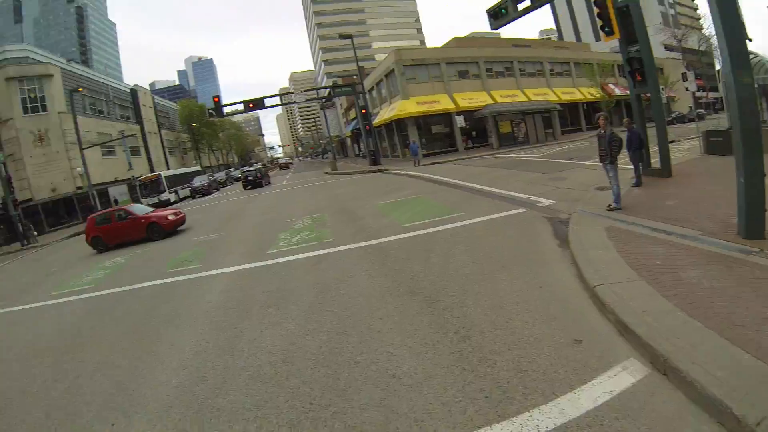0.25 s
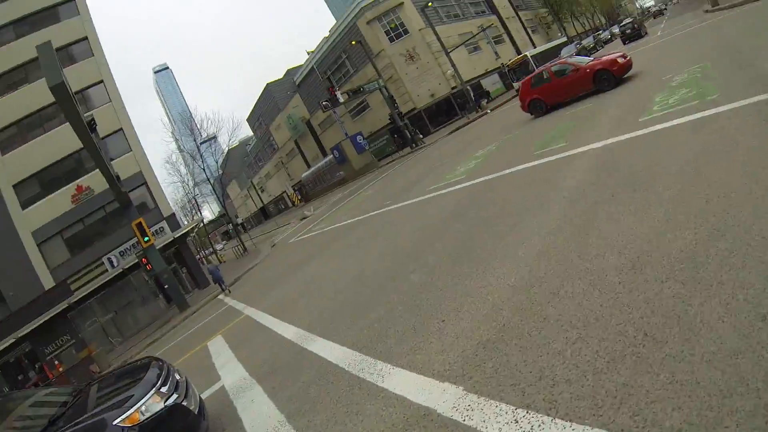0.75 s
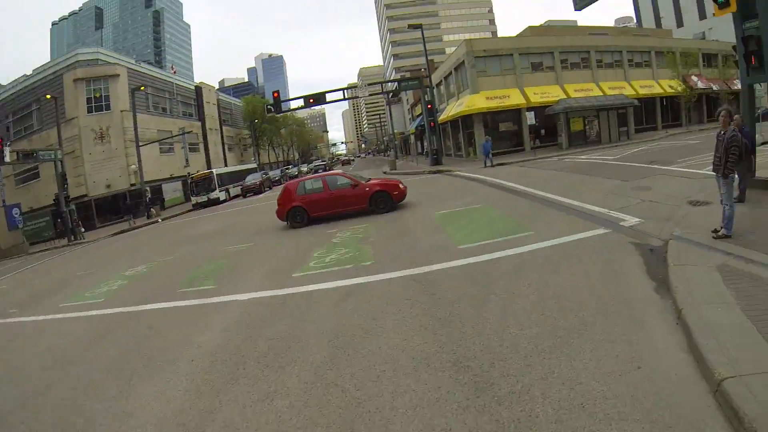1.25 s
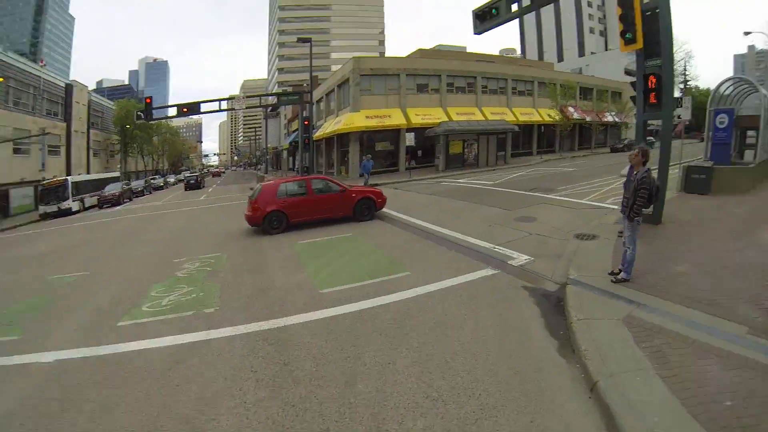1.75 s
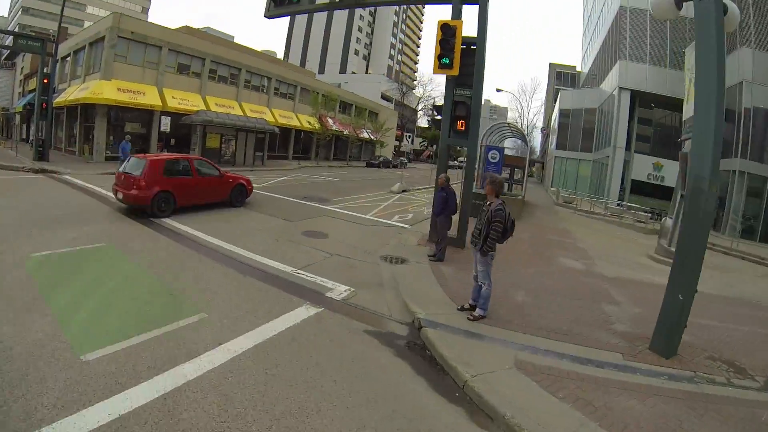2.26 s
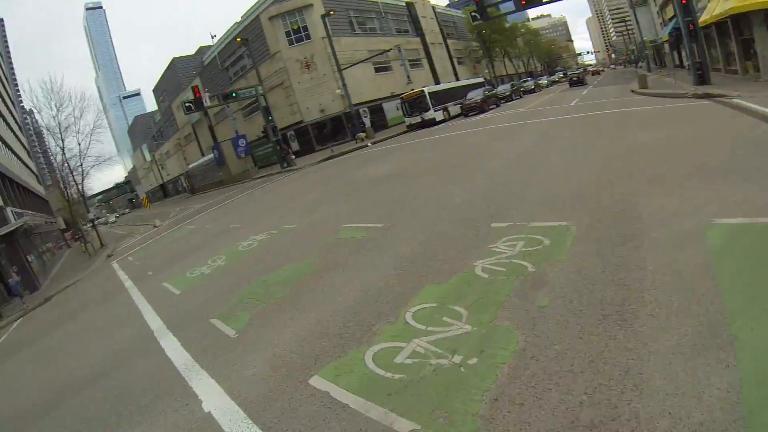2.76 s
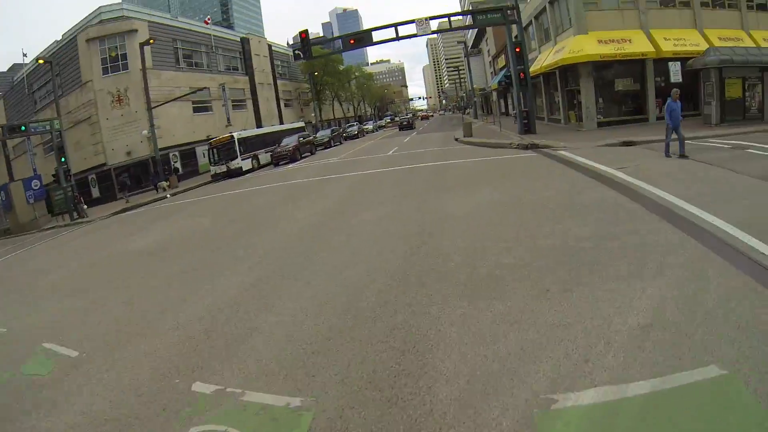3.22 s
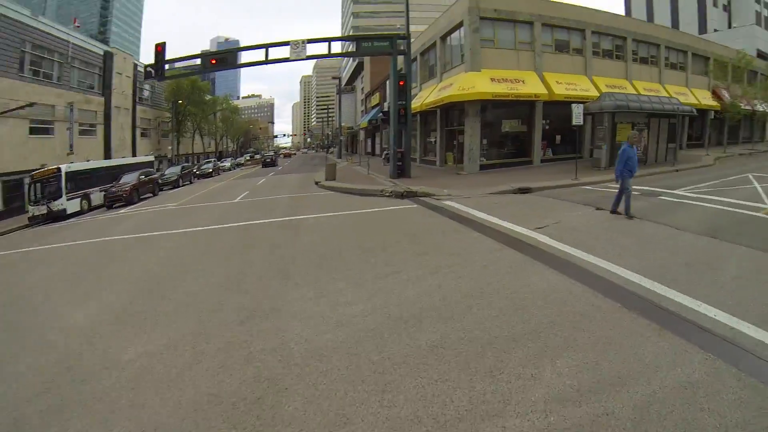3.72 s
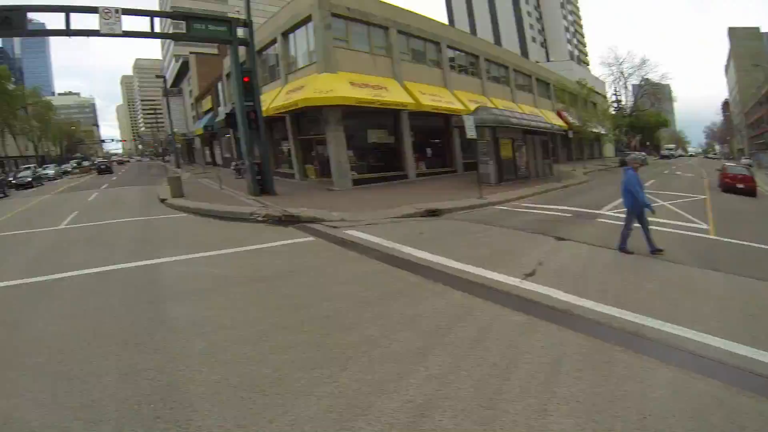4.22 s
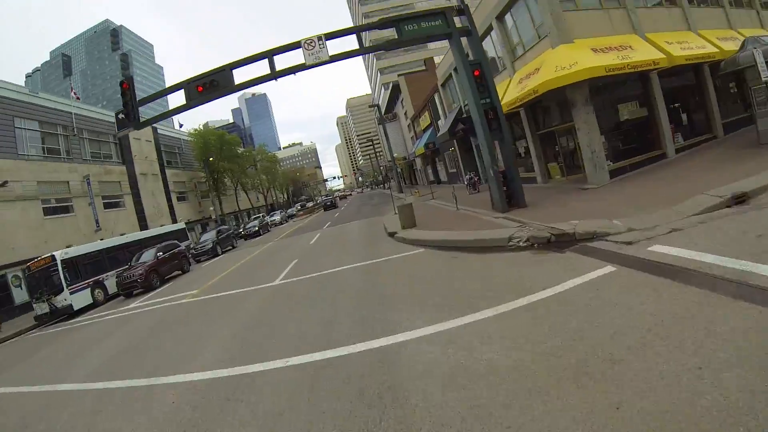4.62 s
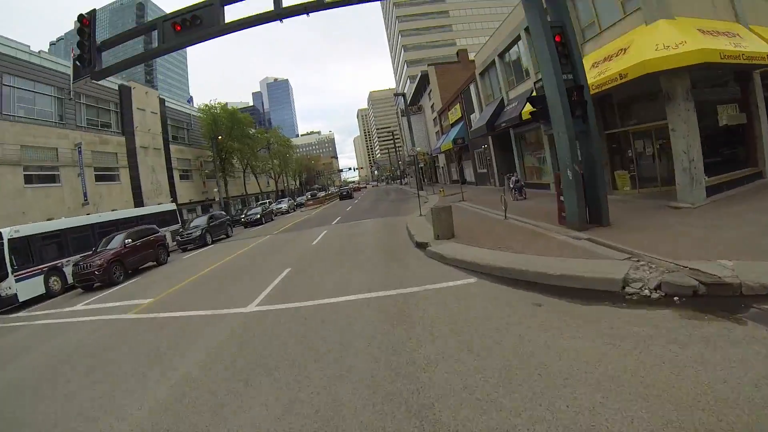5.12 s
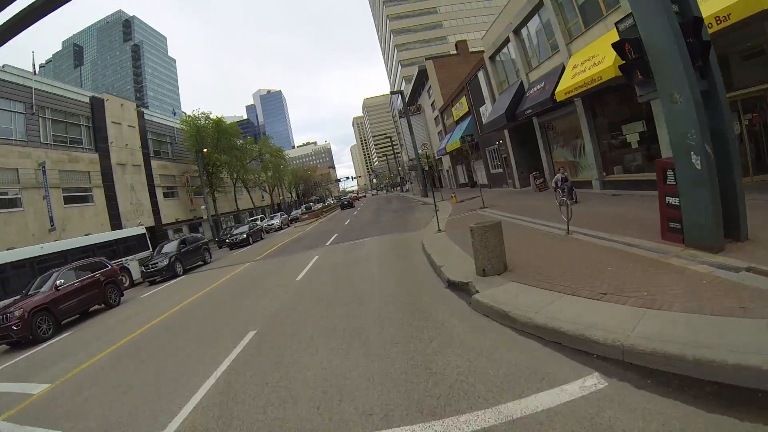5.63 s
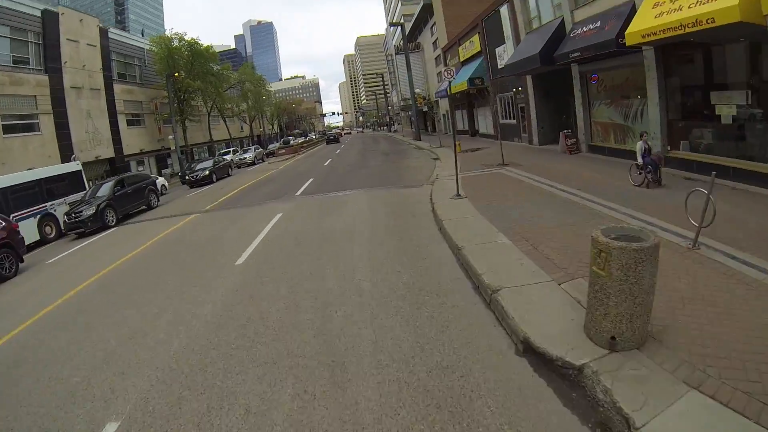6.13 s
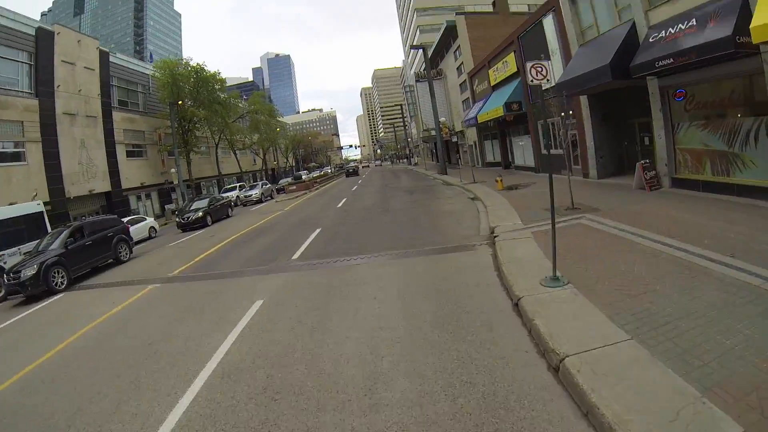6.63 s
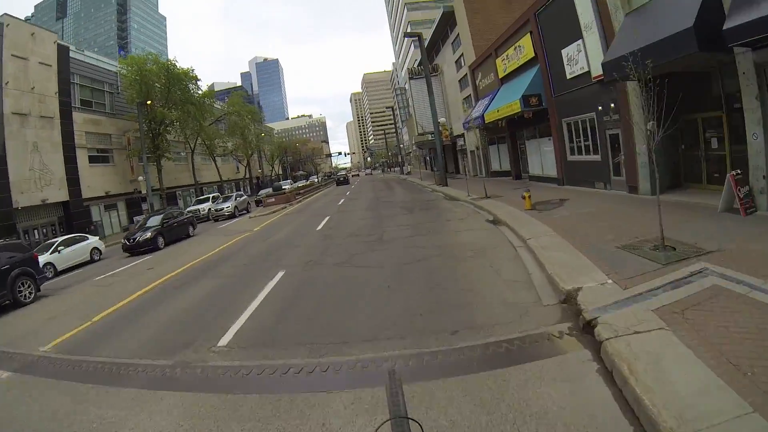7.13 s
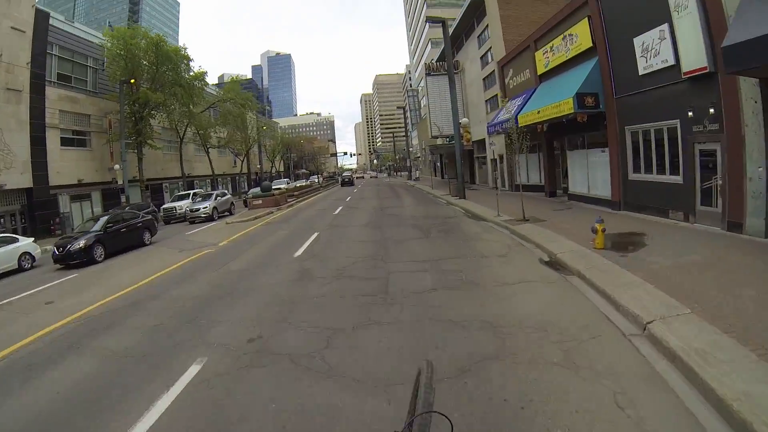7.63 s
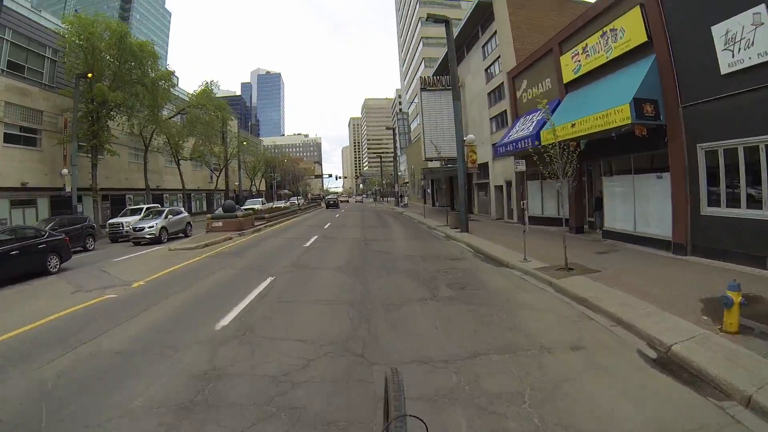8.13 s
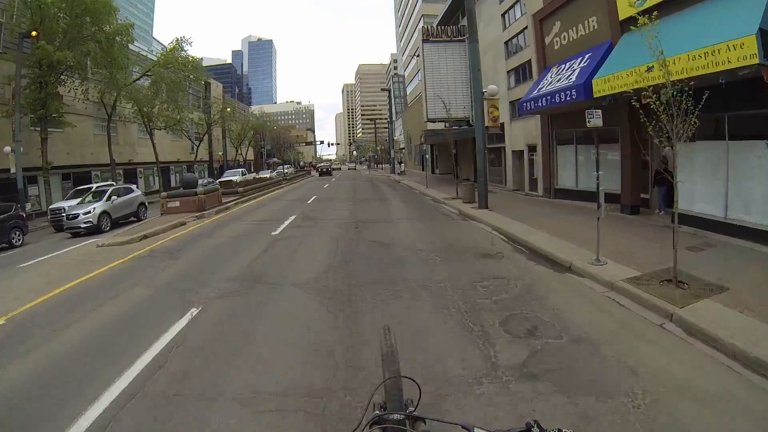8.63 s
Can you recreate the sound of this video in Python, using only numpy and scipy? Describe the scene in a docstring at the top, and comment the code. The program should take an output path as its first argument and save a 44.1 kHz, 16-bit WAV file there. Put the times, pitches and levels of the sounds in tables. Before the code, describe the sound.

Close, boxy sound from a small encased microphone on a cyclist outdoors in town. First a gritty scrape and rattle, broken off sharply, then a short gap. Tyres swell in with a steady hollow rush, wind flutters deep below, metal parts tick and jingle briefly, the case knocks. Bumps thud, the strongest late on, followed by chain chatter, low tyre moan and distant traffic.

```python
"""A city street, where a bicycle rolls along, heard by a small microphone shut in a plastic case on the rider.
A loud scraping clatter of filtered noise breaks off; after a short silence the ride fades in.
Wind and frame are slow and resonant noise; tyres, traffic and case cavity are noise shaped in bands.
Chain, loose part and case are struck modes that ring and decay; bumps are smooth pressure pulses.
Faint gliding whistles, a top hiss and a regularly repeated buzz lie behind them."""
import sys
import numpy as np
from scipy import signal
from scipy.fft import rfft, irfft, next_fast_len
from scipy.io import wavfile
from scipy.ndimage import uniform_filter1d

SR = 44100
rng = np.random.default_rng(int(sys.argv[2]) if len(sys.argv) > 2 else 0)


def transcribe(u):
    """Save the signal u as a 16-bit wav file named by the first command-line argument.

    u: samples, shape (n,) or (channels, n), limited to [-1, 1]; the rate is SR.
    q: integer samples, one column per channel.
    """
    v = np.clip(np.atleast_2d(u).T, -1, 1)
    q = np.round(v * 32767).astype(np.int16)
    wavfile.write(sys.argv[1], SR, q)


N = 391166
BREAK_S, RETURN_S = .2858, 0.323  # end of the clatter, start of the ride
FRAME_HZ = 87.8


def from_db(db):
    """Level to amplitude: 20 dB is a factor of ten."""
    return 10 ** (np.asarray(db) / 20)


def rms_one(x):
    """Normalise by the root mean square, so that a later gain sets the level."""
    return x / np.sqrt(np.mean(x ** 2) + 1e-20)


def seconds():
    """Uniform sampling: the time of every sample."""
    return np.arange(N) / SR


def in_time(rows):
    """Linear interpolation of the columns of a table, one value per sample."""
    s, *columns = np.transpose(rows)
    return [np.interp(seconds(), s, column) for column in columns]


def drift(rate):
    """Low-passed noise of rms 1: two equal poles at the rate in Hz leave only slow fluctuation."""
    step = 40  # samples between the computed values
    r = np.exp(-2 * np.pi * rate * step / SR)
    settling = 2000
    noise = rng.standard_normal(N // step + settling + 2)
    slow = signal.lfilter([1], [1, -2 * r, r * r], noise)[settling:]
    return np.interp(np.arange(N) / step, np.arange(len(slow)), rms_one(slow))


def coloured(x, spectrum):
    """Spectral shaping of x to rms 1, with a steep extra fall beyond both ends of the table."""
    size = next_fast_len(N)
    hz = np.arange(1, size // 2 + 2) * SR / size
    at, db = np.transpose(spectrum)
    octaves_outside = np.maximum(np.log2(at[0] / hz), 0) + np.maximum(np.log2(hz / at[-1]), 0)
    gain = from_db(np.interp(np.log(hz), np.log(at), db) - 16.8 * octaves_outside)
    return rms_one(irfft(rfft(x, size) * gain, size)[:N])


def turbulence(spectrum, patchy_db, rate, grit_db=0):
    """Intermittency: uneven grains in six bands whose levels fluctuate partly together, partly alone."""
    edges = np.geomspace(spectrum[0][0] * .8, min(spectrum[-1][0] * 1.2, 20000), 7)
    together, out = drift(rate), 0
    for low, high in zip(edges, edges[1:]):
        grain_db = grit_db * np.minimum(rng.exponential(1, N), 4)
        grains = rng.standard_normal(N) * from_db(grain_db)
        band = signal.sosfilt(signal.butter(2, [low, high], "band", fs=SR, output="sos"), grains)
        out = out + band * from_db(patchy_db * (together + 0.39 * drift(rate)))
    return coloured(out, spectrum)


def resonate(x, hz, width_hz):
    """A damped resonator as a band-pass with gain 1 at its peak."""
    r = np.exp(-np.pi * width_hz / SR)
    top = (1 - r * r) / 2
    return signal.lfilter([top, 0, -top], [1, -2 * r * np.cos(2 * np.pi * hz / SR), r * r], x)


def ring_mode(force, hz, t60):
    """Modal impulse response: a sine that decays by 60 dB in t60 seconds."""
    q, w = from_db(-60 / (t60 * SR)), 2 * np.pi * hz / SR
    return signal.lfilter([0, np.sin(w)], [1, -2 * q * np.cos(w), q * q], force)


def strike(times, level_db, modes, spread_db, contact_s=.0026):
    """Modal excitation: a short gritty contact drives every mode, with a random strength for each."""
    at, out = np.minimum((np.asarray(times) * SR).astype(int), N - 1), np.zeros(N)
    chance = rng.standard_normal((len(at), len(modes)))
    r = np.exp(-1 / (contact_s * SR))
    for k, (hz, db, t60) in enumerate(modes):
        clicks = np.full(N, 1e-18)
        clicks[at] = from_db(level_db + db + spread_db * chance[:, k])
        contact = signal.lfilter([np.sqrt(1 - r * r)], [1, -r], clicks)
        grit = contact * rng.choice([-1, 1], N)
        out += ring_mode(grit, hz, t60)
    return out


def evened(x, window_s):
    """Partial level compression: divide out much of the running rms, then set rms 1."""
    level = np.sqrt(uniform_filter1d(x ** 2, int(window_s * SR)) + 1e-9)
    return rms_one(x / level ** 0.76)


def clatter():
    """Friction noise: a gritty scrape in three bands with separate envelopes, plus narrow resonances."""
    # swells of the scrape: t/s, body level/dB, bright scrape level/dB, air level/dB
    scrape_levels = [(0.0, -28, -33, -42), (0.008, -29.5, -38.5, -45), (0.028, -34.5, -46, -53),
                     (0.033, -40.5, -49, -57), (0.102, -43.5, -64.5, -73), (0.148, -42, -53, -69),
                     (0.158, -37.5, -58, -63), (0.212, -36, -46, -51.5), (0.228, -33.5, -47, -49),
                     (0.24, -41.5, -50.5, -56), (0.268, -41, -51.5, -54), (0.285, -47, -59, -61)]
    # spectrum of the body: f/Hz, relative density/dB
    body_spectrum = [(88, -35), (150, -11.5), (288, -15.5), (377, -17), (613, -26), (697, -15.5),
                     (856, -19.5), (960, -15), (1430, -6), (1690, -3.5), (2150, -15), (3200, -22.5),
                     (4160, -60), (7040, -120)]
    # spectrum of the bright scrape: f/Hz, relative density/dB
    bright_spectrum = [(1650, -25), (2800, -0.5), (3690, -1.5), (4480, -4), (4960, 1), (5340, -2),
                       (5590, -9), (5780, -17), (6200, -2.5), (8060, -46), (13600, -120)]
    # spectrum of the air: f/Hz, relative density/dB
    air_spectrum = [(3410, -41), (5800, -20), (6350, -6), (7150, -7), (8790, -6.5), (9860, -6.5),
                    (14200, -16), (15500, -27)]
    # narrow resonances: f/Hz, width/Hz, level/dB against the layer, layer (0 body, 1 scrape)
    narrow_rings = [(970, 150, -7.5, 0), (1730, 41, 0, 0), (2440, 70, -16, 0), (3680, 150, -5, 1),
                    (5330, 140, 1, 1)]
    t, levels, out = seconds(), in_time(scrape_levels), 0
    for db, spectrum in zip(levels, (body_spectrum, bright_spectrum, air_spectrum)):
        out = out + from_db(db) * turbulence(spectrum, patchy_db=1.5, rate=47.0, grit_db=3.5)
    second_surge = np.clip((t - .15) / 0.028, 0, 1)
    for hz, width_hz, db, layer in narrow_rings:
        ring = evened(resonate(rng.standard_normal(N), hz, width_hz), 0.015)
        out += from_db(levels[round(layer)] + db) * ring * second_surge
    return out * (t <= BREAK_S)


def wind_and_frame():
    """Turbulent pressure on the case, and forced resonance of the frame under road shocks."""
    # low end under the opening clatter: t/s, wind level/dB, frame hum level/dB
    opening_low = [(0.0, -19, -20), (0.054, -48, -44), (0.096, -30.5, -44), (0.196, -30, -50.5),
                   (0.23, -26, -36.5), (0.28, -33, -45.5)]
    # wind pressure on the case during the ride: t/s, level/dB
    gust_levels = [(0.36, -45), (0.57, -39.5), (0.66, -26.5), (0.8, -31), (0.95, -38), (1.12, -36),
                   (1.3, -50), (1.38, -36), (1.68, -44.5), (1.99, -30), (2.04, -48), (2.18, -32),
                   (2.31, -31), (2.4, -41.5), (2.86, -36.5), (2.9, -29), (3.34, -40), (3.39, -30),
                   (3.58, -43.5), (3.62, -24.5), (3.72, -47), (3.81, -35), (4.02, -41.5), (4.27, -30.5),
                   (5.1, -42), (5.19, -36.5), (5.3, -46), (5.8, -40.5), (6.24, -40.5), (6.4, -48),
                   (6.53, -24), (6.67, -23.5), (7.08, -38), (7.14, -31.5), (7.2, -46), (7.37, -32),
                   (7.56, -39), (7.88, -27.5), (8.17, -47), (8.24, -33), (8.3, -47), (8.42, -35.5),
                   (8.87, -42)]
    # road shocks in the frame during the ride: t/s, level/dB
    shock_levels = [(0.4, -56), (0.9, -58.5), (1.3, -59.5), (2.25, -58), (2.29, -44), (2.4, -64.5),
                    (2.9, -56.5), (2.92, -44), (3.07, -48), (4.02, -61.5), (4.08, -43), (4.36, -60),
                    (4.48, -51.5), (5.16, -54.5), (5.88, -49), (5.92, -46), (6.25, -50.5), (6.59, -44),
                    (6.67, -30.5), (6.72, -41.5), (6.76, -35.5), (6.84, -40), (6.91, -57), (7.69, -46.5),
                    (7.75, -58), (7.98, -45), (8.03, -48), (8.07, -50), (8.83, -54), (8.87, -59)]
    # spectrum of the wind: f/Hz, relative density/dB
    wind_spectrum = [(6, 1.5), (15, 1), (25, -16), (40, -17.5), (55, -21.5), (68, -25)]
    wind_lumps_db, wind_lumps_hz = 1, 4
    hum_lumps_db, hum_lumps_hz = 2.5, 12.5
    frame_width_hz = 17
    opening = seconds() < BREAK_S
    first_wind_db, first_hum_db = in_time(opening_low)
    ride_wind_db = in_time(gust_levels)[0] + wind_lumps_db * drift(wind_lumps_hz)
    ride_hum_db = in_time(shock_levels)[0] + hum_lumps_db * drift(hum_lumps_hz)
    wind_db = np.where(opening, first_wind_db, ride_wind_db)
    hum_db = np.where(opening, first_hum_db, ride_hum_db)
    wind = evened(coloured(rng.standard_normal(N), wind_spectrum), 0.13)
    # the tyre swallows faster shocks
    shocks = signal.sosfilt(signal.butter(6, 102, fs=SR, output="sos"), rng.standard_normal(N))
    broad_hum = resonate(shocks, FRAME_HZ, 3.0 * frame_width_hz)
    hum = resonate(broad_hum, FRAME_HZ, frame_width_hz)
    return from_db(wind_db) * wind + from_db(hum_db) * evened(hum, 0.083)


def tyres():
    """Rolling noise: broadband roar and hiss of rms-normalised grains, with fluctuating band levels."""
    # rolling tyres: t/s, roar level/dB before the common gain, hiss level/dB
    rolling_levels = [(0.33, -54, -63), (0.5, -59, -66.5), (0.7, -56, -66), (1.6, -58, -65),
                      (2.6, -56, -65.5), (3.4, -58, -67.5), (4.3, -58, -67), (4.7, -57, -67.5),
                      (5.3, -59, -69), (6.1, -57, -65.5), (6.4, -59.5, -69), (6.55, -55, -67.5),
                      (6.64, -51.5, -58.5), (6.75, -57, -66.5), (6.9, -59, -68.5), (7.5, -59, -68.5),
                      (7.87, -57.5, -67), (8.16, -61, -71), (8.87, -59.5, -69.5)]
    # spectrum of the roar: f/Hz, relative density/dB
    roar_spectrum = [(590, -16.5), (1000, -20), (1230, -16.5), (1390, -4), (1620, 0.5), (1700, -2.5),
                     (1860, -10.5), (1950, -3.5), (2090, -9), (2300, -8), (2450, -10.5), (2650, -13.5),
                     (2900, -17), (3130, -17), (3400, -22.5), (4420, -47), (7480, -120)]
    # spectrum of the hiss: f/Hz, relative density/dB
    hiss_spectrum = [(1880, -28), (3200, -2.5), (3800, -6), (4200, -6), (4450, -6.5), (5330, -6.5),
                     (5940, -14.5), (6510, -12.5), (7090, -20), (7700, -15.5), (9000, -22), (11700, -38),
                     (19800, -120)]
    roar_gain_db = 5.0
    roar_db, hiss_db = in_time(rolling_levels)
    roar = turbulence(roar_spectrum, patchy_db=1.55, rate=20.0, grit_db=1.5)
    hiss = turbulence(hiss_spectrum, patchy_db=1.5, rate=12.0, grit_db=2.0)
    return from_db(roar_db + roar_gain_db) * roar + from_db(hiss_db) * hiss


def tyre_moan():
    """Resonance of the tyres at two pitches: noise through a broad and then a narrow resonator."""
    # moan of the tyres: t/s, lower level/dB, upper level/dB, both before the common gain
    moan_levels = [(1.2, -81, -69), (2.04, -67, -66.5), (2.4, -82, -65), (3.3, -74, -104), (4.16, -67, -81),
                   (4.9, -58, -64), (5.47, -70, -75), (5.899, -60, -60), (6.3, -69, -82), (6.46, -76, -82),
                   (6.7, -60, -64), (7.06, -59.5, -67), (7.229, -49.5, -63), (7.51, -64.5, -64),
                   (7.94, -59, -59.5), (8.87, -64.5, -63.5)]
    # pitches of the moan: lower f/Hz, upper f/Hz
    moan_hz = (393.6, 714)
    # final resonance widths: lower width/Hz, upper width/Hz
    moan_width_hz = (28, 130)
    moan_gain_db = -5.5
    out = 0
    for db, hz, width_hz in zip(in_time(moan_levels), moan_hz, moan_width_hz):
        broad = resonate(rng.standard_normal(N), hz, 2.9 * width_hz)
        out = out + from_db(db + moan_gain_db) * rms_one(resonate(broad, hz, width_hz))
    return out


def case_cavity():
    """Cavity resonance: one fluctuating noise drives two bands in which the case sings."""
    # singing of the main band: t/s, level/dB
    main_levels = [(0.33, -53), (0.52, -55), (0.62, -51), (1.11, -56), (2.6, -55.5), (2.67, -47.5),
                   (3.11, -54.5), (3.36, -52.5), (3.41, -47.5), (3.82, -54), (3.87, -47), (4.15, -53.5),
                   (4.29, -51.5), (5.2, -58), (6.13, -58), (6.15, -47), (6.38, -64), (6.63, -50),
                   (6.7, -53), (7.33, -72), (7.85, -58), (8.87, -62.5)]
    # singing of the higher band: t/s, level/dB
    upper_levels = [(0.33, -70), (2.5, -70), (3.6, -64), (5, -65.5), (6.2, -64.5), (6.6, -59), (7, -66.5),
                    (7.8, -64), (8.87, -67)]
    main_hz, main_width_hz = 1630, 174
    upper_hz, upper_width_hz = 2390, 360
    air = rng.standard_normal(N) * from_db(1.5 * drift(16.5))
    main = resonate(resonate(air, main_hz, 1.67 * main_width_hz), main_hz, main_width_hz)
    upper = resonate(resonate(air, upper_hz, upper_width_hz), upper_hz, upper_width_hz)
    main_gain, upper_gain = from_db(in_time(main_levels)[0]), from_db(in_time(upper_levels)[0])
    return main_gain * rms_one(main) + upper_gain * rms_one(upper)


def chain():
    """Impact sound: ticks with a weaker bounce about one frame period later, chatter, sparse random hits."""
    # chain against the frame: t/s, relative strike level/dB
    tick_rows = [(0.798, -40), (0.8321, -47), (0.861, -46), (0.897, -43), (1.394, -46), (1.628, -46),
                 (2.384, -49), (2.5555, -47), (2.8864, -42), (2.93, -46), (2.984, -47), (3.197, -44),
                 (3.3439, -47.5), (3.3962, -48), (3.4611, -48), (3.7365, -47), (3.7824, -46), (3.81, -44),
                 (3.8542, -46), (3.953, -47), (4.4232, -36.5), (4.451, -45), (4.4827, -39.5), (4.556, -40),
                 (4.7756, -49), (4.8639, -48), (4.985, -44), (5.186, -48), (5.196, -48), (5.2142, -42),
                 (5.226, -47), (5.264, -40), (5.614, -43), (5.6317, -45), (5.753, -47), (5.9539, -40),
                 (6.005, -47), (6.061, -40.5), (6.144, -58), (6.4538, -53), (6.488, -46), (6.5211, -52),
                 (6.625, -43), (6.786, -43), (6.913, -49), (6.9524, -42), (7.064, -36.5), (7.14, -43),
                 (7.5435, -44.5), (7.654, -43), (7.6673, -43), (7.681, -43), (7.705, -36.5), (7.7773, -43),
                 (7.794, -46), (7.811, -48), (7.902, -60), (8.348, -41), (8.3702, -41), (8.404, -55),
                 (8.415, -51), (8.43, -51), (8.482, -44), (8.498, -55), (8.555, -53)]
    # modes of chain and stays: f/Hz, level/dB, decay time t60/s
    low_modes = [(2450, -2, .014), (3060, -3, .009), (3500, -5, .008), (4000, -3, .013), (4250, -3, .011),
                 (4700, -4, .008), (5170, -2, .015), (5500, -3, .011)]
    # modes above 6 kHz: f/Hz, level/dB, decay time t60/s
    top_modes = [(6400, -2, .01), (7100, -2, .01), (7750, 0, .011), (8600, -2, .009), (9600, -7, .007),
                 (11400, -12, .006)]
    # dense chatter on rough ground: start t/s, end t/s, initial level/dB
    chatter_rows = [(3.174, 3.23, -73), (4.557, 4.616, -77), (4.872, 4.912, -71), (4.989, 5.022, -71),
                    (5.324, 5.393, -70), (5.567, 5.717, -73), (5.95, 5.988, -83), (5.995, 6.06, -70.5),
                    (6.15, 6.19, -72), (6.465, 6.497, -71), (6.512, 6.568, -71), (6.635, 6.656, -70),
                    (6.665, 6.726, -69), (6.79, 6.81, -69), (7.064, 7.098, -65), (7.124, 7.173, -70),
                    (7.651, 7.71, -65.5), (7.699, 7.764, -69), (7.747, 7.89, -72.5), (8.337, 8.463, -76),
                    (8.465, 8.563, -74.5)]
    chatter_per_s, stray_per_s, stray_db = 800.0, 22.0, -68.0
    s, db = np.transpose(tick_rows)
    chance = rng.standard_normal((len(s), 3))
    top_db = -21.5 + chance[:, 2]  # top modes against the tick
    bounce_s = s + 1 / FRAME_HZ + .0015 * chance[:, 0]
    bounce_db = db - 10.5 + 2.5 * np.clip(chance[:, 1], -3, 1)
    s, db, top_db = np.r_[s, bounce_s], np.r_[db, bounce_db], np.r_[top_db, top_db]
    out = strike(s, db - 8.5, low_modes, spread_db=1.5, contact_s=.003)
    out += strike(s, db + top_db, top_modes, spread_db=1.5, contact_s=.0015)

    t, dice = seconds(), rng.random(N)
    # a drifting hit rate gathers the stray hits in clusters
    stray = (dice < stray_per_s * from_db(5.0 * drift(3)) / SR) & (t > .9)
    level_db = np.where(stray, stray_db, -200)
    for start, end, chatter_db in chatter_rows:
        on = (t > start) & (t < end) & (dice < chatter_per_s / SR)
        level_db[on] = chatter_db - 13.5 * ((t[on] - start) / (end - start)) ** 2  # it dies away
    hit = level_db > -199
    hit_db = level_db[hit] + 0.54 * rng.standard_normal(N)[hit]
    out += strike(t[hit], hit_db, low_modes, spread_db=2.4)
    return out + strike(t[hit], hit_db - 9, top_modes, spread_db=2.4)


def loose_part():
    """Modal ringing of a loose metal part: soft jolts excite a few modes."""
    # jolts: t/s, relative strike level/dB
    jolt_rows = [(2.523, -50), (2.74, -50), (3.184, -49), (3.352, -47), (3.775, -48), (3.958, -42),
                 (4.265, -55), (4.303, -39), (4.36, -58), (4.553, -54), (5.57, -55), (5.601, -48),
                 (5.757, -47)]
    # modes of the part: f/Hz, level/dB, decay time t60/s
    part_modes = [(2410, -4, .025), (2500, -3, .03), (3050, -13, .015), (4240, -13, .022),
                  (5270, -15, .022)]
    s, db = np.transpose(jolt_rows)
    return strike(s, db, part_modes, spread_db=2.0, contact_s=.007)


def knocks():
    """Selective excitation of the case: clean blows favour low modes near the struck pitch, grit the high."""
    # jolts of the case: t/s, relative strike level/dB, struck pitch f/Hz, extra level/dB of the high modes
    knock_rows = [(0.0012, -23, 1520, -14), (0.0045, -29, 1600, -4), (0.0203, -26, 1580, -12),
                  (0.027, -30, 1570, -8), (0.172, -26, 1510, -10), (0.18, -34, 1510, -10),
                  (0.198, -30, 1710, -5), (0.214, -25, 1770, -14), (0.225, -22, 1780, -15),
                  (0.231, -26, 1780, -20), (0.262, -32, 1720, -8), (1.5073, -35, 1610, -22),
                  (2.671, -45, 1580, -17), (3.404, -36, 1620, -22), (3.444, -33, 1630, -24),
                  (3.514, -33, 1635, -24), (3.565, -33, 1630, -23), (3.844, -36.5, 1650, -20),
                  (3.910, -35.5, 1630, -20), (4.489, -33, 1600, -20), (4.6765, -30, 1500, -6.5),
                  (4.6858, -33, 1630, -11), (4.691, -36, 1500, -9), (4.697, -41, 1800, -5),
                  (4.7058, -36, 1680, -14), (4.712, -36, 1660, -13), (4.772, -40, 1830, 0.5),
                  (4.7764, -37, 1830, -4), (4.786, -37, 1830, -17), (6.557, -41, 1600, -1),
                  (6.578, -45, 1600, 2), (6.63, -38, 1610, -0.5), (6.6398, -37, 1620, -2),
                  (6.67, -41, 1600, 2), (7.814, -40, 1550, -8)]
    # modes of the plastic case: f/Hz, level/dB, decay time t60/s
    case_modes = [(1490, 0, 0.035), (1634, 0, 0.04), (1820, 0, 0.03), (2150, -3, 0.018), (2450, -1, 0.025),
                  (2780, -4, 0.016), (3100, -3, 0.02), (3500, -7, 0.014)]
    loss_db_per_octave = 78  # low modes away from the struck pitch ring less
    blow_width_hz = 250  # a soft blow builds up over a few cycles
    s, db, struck_hz, bright_db = np.transpose(knock_rows)
    out = strike(s, db + bright_db - 4, case_modes[3:], spread_db=1.5, contact_s=.004)
    for hz, mode_db, t60 in case_modes[:3]:
        octaves_away = np.abs(np.log2(hz / struck_hz))
        clicks = np.full(N, 1e-18)
        clicks[(s * SR).astype(int)] = from_db(db + mode_db - loss_db_per_octave * octaves_away)
        out += resonate(ring_mode(clicks, hz, t60), hz, blow_width_hz)
    return out


def thumps():
    """Impulse response to a bump: a smooth inward push, and the fork that springs back and rings briefly."""
    # wheel over bumps: centre of the push t/s, relative depth/dB, length/s
    bump_rows = [(1.983, -19, 0.035), (2.285, -26.5, 0.018), (6.6545, -11, 0.013), (6.738, -20, 0.016),
                 (7.852, -21, 0.017)]
    t, push = seconds(), np.zeros(N)
    for s, db, length in bump_rows:
        push -= from_db(db) * np.exp(-(4.3 * (t - s) / length) ** 2 / 2)
    fork = resonate(push, 52, 28)
    return .8 * push + .7 * fork


def traffic_drone():
    """Distant broadband sources merge into one low noise, here with slowly fluctuating bands."""
    # traffic drone: t/s, level/dB
    drone_levels = [(0.33, -55), (0.6, -60), (1.2, -60.5), (2.5, -61), (4, -60.5), (5, -57.5), (6.3, -59),
                    (7.5, -56), (8.87, -54)]
    # spectrum of the drone: f/Hz, relative density/dB
    drone_spectrum = [(65, -53), (110, -16.5), (119, -4), (189, -10.5), (259, -12), (311, -13.5),
                      (500, -21.5), (700, -30), (873, -29.5), (980, -24), (1100, -24), (1430, -34),
                      (2420, -120)]
    return from_db(in_time(drone_levels)[0]) * turbulence(drone_spectrum, patchy_db=1.0, rate=2.7)


def whistles():
    """Modulated tones from the passing traffic: low-passed noise multiplies a sine of wavering pitch."""
    # one table for each gliding whistle: t/s, f/Hz, level/dB
    glide_tables = [
        [(1.25, 5600, -120), (1.4, 5730, -76), (2.0, 5700, -76), (2.55, 5600, -76), (2.62, 5600, -120)],
        [(1.3, 6600, -120), (1.6, 6700, -78), (2.55, 6640, -79), (2.64, 6650, -120)],
        [(2.0, 8600, -120), (2.2, 8900, -89), (2.36, 9300, -85), (2.6, 9650, -83), (2.8, 10080, -79),
         (2.92, 10200, -120)],
    ]
    out = 0
    for rows in glide_tables:
        hz, db = in_time(rows)
        r = np.exp(-2 * np.pi * 60.0 / SR)
        breath = rms_one(signal.lfilter([1], [1, -r], rng.standard_normal(N)))
        phase = 2 * np.pi * np.cumsum(hz + 41.0 * drift(7.0)) / SR
        out = out + from_db(db + 2.5 * drift(6.7)) * breath * np.sin(phase)
    return out


def sizzle():
    """Noise with periodic gating: a fluctuating top hiss, and bursts of random strength at a fixed rate."""
    # spectrum of the hiss: f/Hz, relative density/dB
    sizzle_spectrum = [(5180, -22), (8800, -5.5), (9270, -6), (11700, -1.5), (13500, -10), (14200, -5),
                       (15500, -20)]
    # spectrum of the buzz: f/Hz, relative density/dB
    buzz_spectrum = [(6800, -7), (7700, -1), (8600, -7), (10200, -9), (11500, -6), (12500, -3),
                     (14500, -17)]
    # two bursts in every period, long then short: start t/s, length/s, level/dB over the top hiss
    burst_rows = [(.0146, .0062, 2), (.0322, .0026, 0)]
    period_s, sizzle_db = 1.001 / 30, -81
    t, gate = seconds(), 0
    chance = rng.standard_normal((int(N / SR / period_s) + 2, len(burst_rows)))
    strength = from_db(5.0 * np.clip(chance, -3, 1.5))
    for k, (start, length, db) in enumerate(burst_rows):
        period, since = np.divmod(t - start + period_s, period_s)
        gate = gate + from_db(db) * strength[period.astype(int), k] * (since < length)
    smooth_gate = uniform_filter1d(gate, size=30)
    buzz = smooth_gate * coloured(rng.standard_normal(N), buzz_spectrum)
    hiss = turbulence(sizzle_spectrum, patchy_db=2.3, rate=31.0)
    return from_db(sizzle_db) * (hiss + buzz)


def scene():
    """Superposition: the pressures of all sources add at one microphone."""
    steady = tyres() + tyre_moan() + case_cavity() + traffic_drone() + sizzle()
    blows = chain() + loose_part() + knocks() + thumps()
    out = clatter() + wind_and_frame() + blows + whistles()
    return (out + steady * (seconds() > BREAK_S))[None]


def record(dry):
    """Gating and low-pass filtering: an abrupt break, a silence, a linear fade-in, and a cut top."""
    fade_in_s, fade_from_db, break_fade_s, cutoff_hz = 1.12, -23, .0005, 15350
    t = seconds()
    onset = np.clip((t - RETURN_S) / 0.004, 0, 1)
    fade_in = np.clip(from_db(fade_from_db) + (t - RETURN_S) / fade_in_s, 0, 1) * onset
    fade_out = np.clip((BREAK_S - t) / break_fade_s, 0, 1)
    gain = np.where(t < BREAK_S, fade_out, fade_in)
    low_pass = signal.ellip(8, .5, 60, cutoff_hz, fs=SR, output="sos")
    return signal.sosfilt(low_pass, dry * gain)


dry = scene()
out = record(dry)
transcribe(out)
```